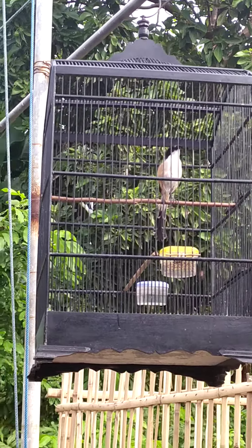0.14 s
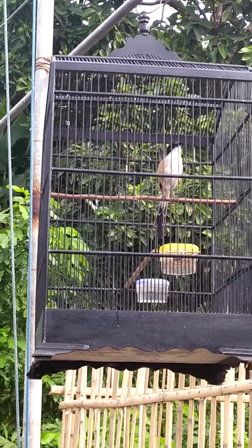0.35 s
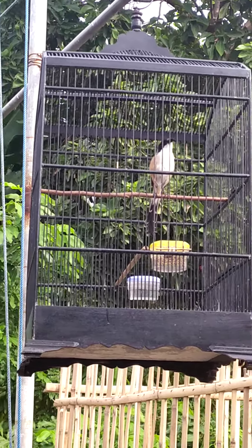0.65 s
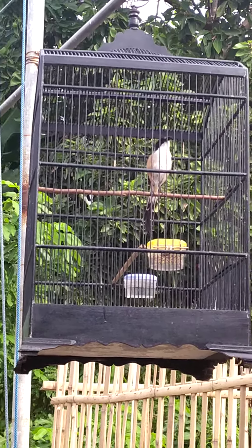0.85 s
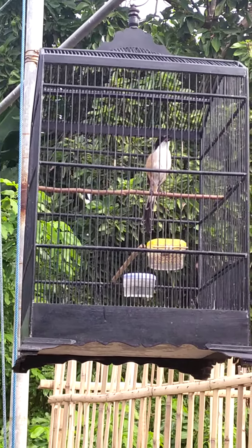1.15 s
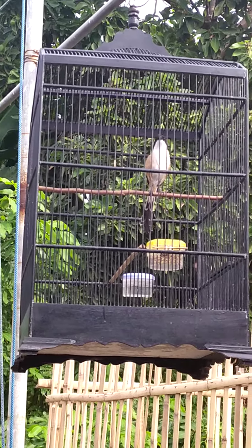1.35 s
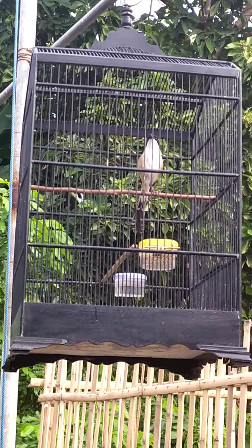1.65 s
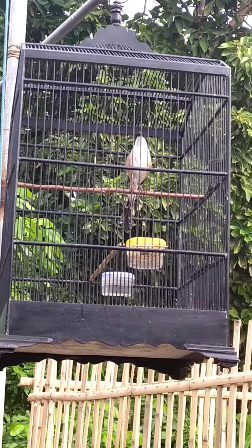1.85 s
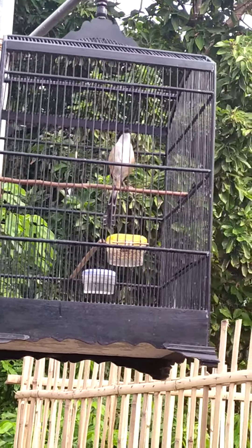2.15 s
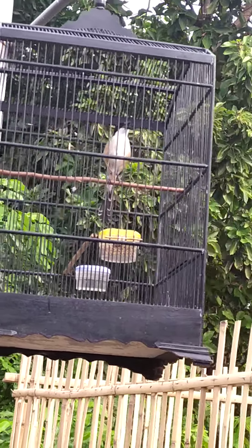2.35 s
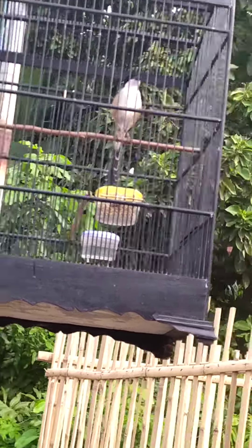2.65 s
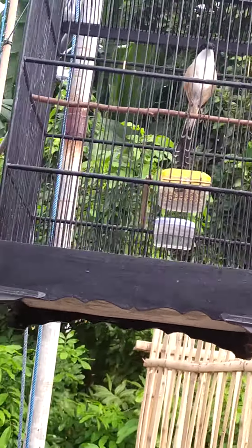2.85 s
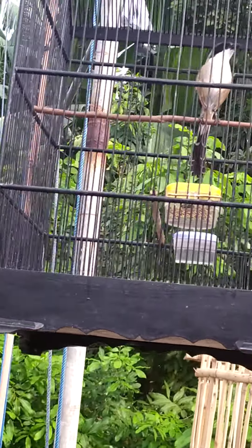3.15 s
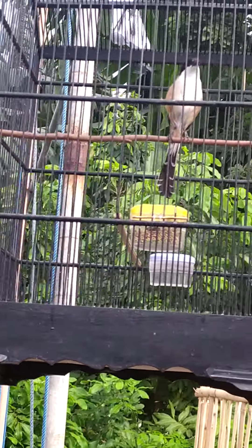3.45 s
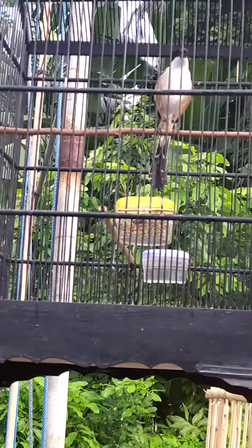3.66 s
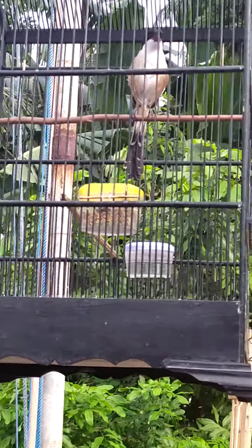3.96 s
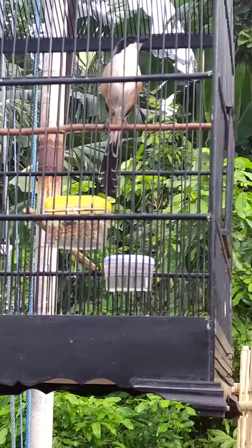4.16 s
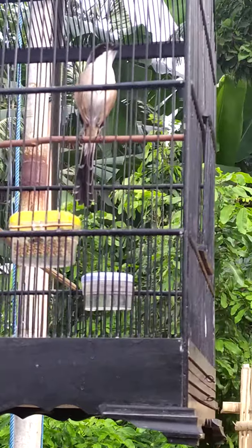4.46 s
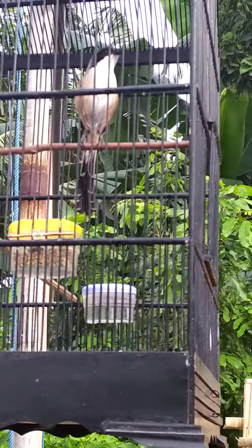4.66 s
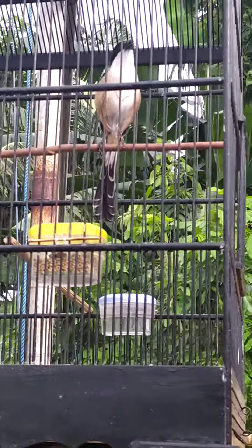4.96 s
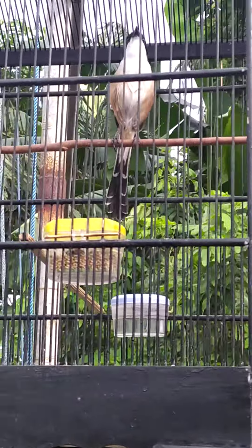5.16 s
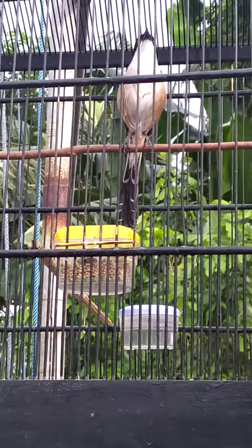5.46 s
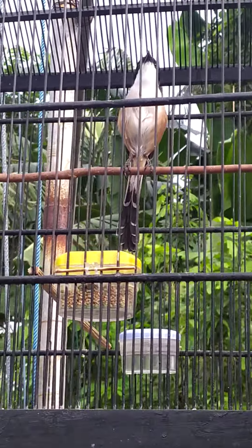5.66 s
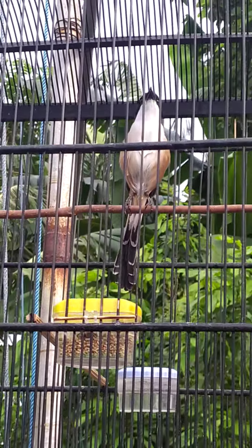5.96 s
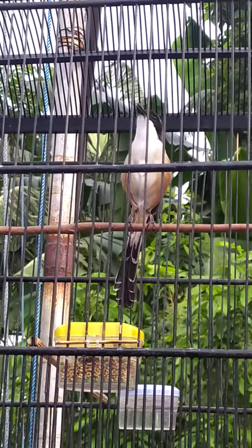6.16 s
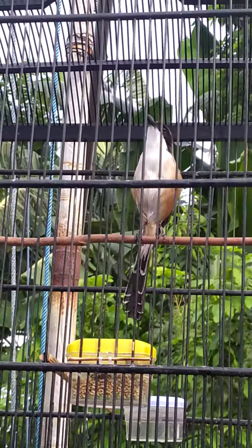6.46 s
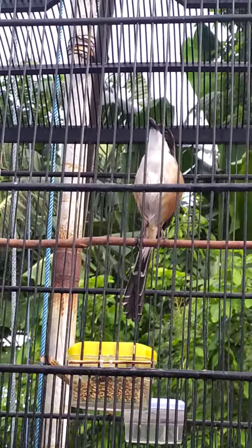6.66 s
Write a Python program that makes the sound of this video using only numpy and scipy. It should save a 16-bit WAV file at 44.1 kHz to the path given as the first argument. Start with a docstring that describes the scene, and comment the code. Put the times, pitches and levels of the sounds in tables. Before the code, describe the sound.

A caged songbird sings close by outdoors with sharp chips, rasping slurs, buzzes and falling whistles over a faint low hum.

```python
"""A caged shrike sings close by in a garden: two rasping slurs, a run of chips, buzzes, falling whistles.
Its syrinx membranes flutter and jitter as the voice roughens; both sides sound in slurs and chips.
Four sharp snaps fall among the notes. Cage and walls throw the song back.
Behind it, over gusty air, a far engine hums, other birds call faintly and small knocks come from nearby."""
import sys
import numpy as np
from scipy import signal
from scipy.fft import rfft, irfft, next_fast_len
from scipy.io import wavfile
from scipy.ndimage import uniform_filter1d

SR = 44100
rng = np.random.default_rng(int(sys.argv[2]) if len(sys.argv) > 2 else 0)


def generate_wav(sig):
    """Save sig (samples, or channels by samples) to the path in sys.argv[1] as 16-bit PCM at SR."""
    pcm = np.round(np.clip(np.atleast_2d(sig).T, -1, 1) * 32767).astype(np.int16)
    wavfile.write(sys.argv[1], SR, pcm)


N = 300321
BAND_EDGE_HZ = 16300


def amp(db):
    """Decibels to gain."""
    return 10 ** (np.asarray(db) / 20)


def unit_rms(x):
    """Scales to rms 1."""
    return x / np.sqrt(np.mean(x ** 2) + 1e-20)


def lookup(points, hz):
    """Interpolates a table on a log-frequency axis."""
    f, value = np.transpose(points)
    return np.interp(np.log(np.abs(hz) + 1), np.log(f + 1), value)


def ramp(t, span):
    """Linear rise from 0 to 1 over span."""
    return np.clip(t / span, 0, 1)


def step(t, width):
    """S-curve from 0 to 1 around t = 0."""
    return .5 + .5 * np.tanh(.5 * t / width)


def envelope_db(t, attack_s, fade_db_per_s, release_s, power=1):
    """Attack, steady fade and release."""
    gate = ramp(t, attack_s) ** power * ramp(t[-1] - t, release_s)
    return 20 * np.log10(gate + .02) - fade_db_per_s * np.maximum(t - attack_s, 0)


def add(mix, start_s, sound):
    """Mixes a sound in at start_s."""
    part = mix[..., max(round(start_s * SR), 0):][..., :sound.shape[-1]]
    part += sound[..., :part.shape[-1]]


def wander(size, hz):
    """Random drift up to hz, rms 1."""
    f = np.fft.rfftfreq(size, 1 / SR)
    return unit_rms(irfft(rfft(rng.standard_normal(size)) / (1 + (f / hz) ** 4), size))


def lowpass(x, hz):
    """Steep low-pass for complex signals."""
    f = np.fft.fftfreq(len(x), 1 / SR)
    return np.fft.ifft(np.fft.fft(x) / (1 + (f / hz) ** 6))


def coloured(x, points, db_per_octave=0):
    """Filters by a spectrum table, keeping the power of white noise."""
    f = np.fft.rfftfreq(len(x), 1 / SR)
    gain = unit_rms(amp(lookup(points, f) + db_per_octave * np.log2(f + 100)))
    return irfft(rfft(x) * gain, len(x))


# Each row: frequency in Hz, relative density in dB.
AIR_SPECTRUM = [(25, -15), (45, -5), (65, 0.5), (110, 0), (160, -13), (260, -19), (600, -25.5), (1200, -31),
                (2200, -30.5), (4700, -35), (6500, -37), (12500, -35.5), (16000, -43.5)]
# Each row: frequency in Hz, left-right correlation before the cap.
AIR_CORRELATION = [(60, 1), (180, 1), (550, 0.76), (1650, 0.096), (15000, 0)]


def air():
    """Gusty rumble under an even hiss."""
    f = np.fft.rfftfreq(N, 1 / SR)
    left, independent = rfft(rng.standard_normal((2, N)))
    correlation = np.clip(lookup(AIR_CORRELATION, f), -.93, .93)
    right = correlation * left + np.sqrt(1 - correlation ** 2) * independent
    steady = unit_rms(irfft(np.array([left, right]) * amp(lookup(AIR_SPECTRUM, f)), N))
    rumble = irfft(rfft(steady) / (1 + (f / 200) ** 2), N)
    gusts = amp(1.2 * wander(N, 4)) - 1
    return amp(-54.5) * (steady + gusts * rumble)


def far_engine(first_hz=104.6, revved_hz=134, rev_at_s=5.45, nearest_at_s=4.03, pass_s=1.16):
    """A wavering hum, loudest as the engine passes; it holds one speed, then revs up."""
    t = np.arange(N) / SR
    hz = first_hz + (revved_hz - first_hz) * step(t - rev_at_s, .05)
    hz *= 1 + .0131 * wander(N, 16)
    hum = np.sqrt(2) * np.sin(2 * np.pi * np.cumsum(hz) / SR)
    distance = np.hypot(1, (t - nearest_at_s) / pass_s)
    return hum * amp(-57 + 2 * wander(N, 10)) / distance


# Each row: start and length in seconds, first and last pitch in Hz before the arch, level in dB,
# waver as a share of pitch.
FAR_CALLS = [(0.009, 0.92, 720.3, 631, -63.5, 0.15), (0.33, 0.3, 5180, 4450, -73, 0.022),
             (0.32, .13, 4230, 4020, -75, .01), (0.947, 0.25, 4580, 4110, -65, 0.017),
             (1.801, 0.26, 690, 655, -65.5, 0.0087), (4.415, 0.098, 2420, 2200, -68, 0.017),
             (6.493, 0.085, 681, 688, -53, 0.013), (6.767, 0.064, 635, 713, -58.5, .01)]


def far_birds():
    """Faint arched whistles and coos."""
    out = np.zeros(N)
    for start_s, length_s, first_hz, last_hz, db, waver in FAR_CALLS:
        progress = np.linspace(0, 1, int(length_s * SR))
        arch = np.sin(np.pi * progress)
        hz = first_hz + (last_hz - first_hz) * progress
        hz *= 1 + .0594 * (arch - .7) + waver * wander(len(hz), 58)
        add(out, start_s, amp(db) * np.sqrt(2 * abs(arch)) * np.sin(2 * np.pi * np.cumsum(hz) / SR))
    return out


# Each row: start in seconds, level in dB, decay in seconds, tilt in dB per octave.
KNOCKS = [(0.486, -53, 0.026, 1), (0.848, -49.5, 0.028, 1), (2.148, -52, 0.043, -2),
          (2.575, -54, 0.086, 14.5), (2.623, -44.5, 0.032, 8), (3.293, -53.5, 0.018, 5),
          (3.781, -57.5, 0.54, 6.5), (4.648, -50, 0.026, 4), (5.541, -44.5, 0.019, 5.5),
          (5.59, -55, 0.048, 5)]
# Each row: frequency in Hz, relative level in dB.
KNOCK_SPECTRUM = [(100, 17), (400, 14.5), (900, 6.5), (1900, 5.5), (3500, -5.5), (8000, -13),
                  (12000, -20.5), (16000, -29)]


def knocks():
    """Small dry knocks and scuffs: decaying noise bursts."""
    out = np.zeros((2, N))
    t = np.arange(SR // 4) / SR
    for start_s, db, decay_s, tilt in KNOCKS:
        for channel in out:
            noise = coloured(rng.standard_normal(len(t)), KNOCK_SPECTRUM, tilt)
            add(channel, start_s, amp(db) * noise * np.exp(-t / decay_s))
    return out


# Each row: frequency in Hz, gain of the open beak on overtones in dB.
BEAK_RESPONSE = [(4000, -7), (6000, 3.5), (7500, 5.5), (9000, -3), (10200, -18.5), (11400, 20.5),
                 (12200, 3.5), (13500, -2), (16000, -20.5)]
# Air rushing through the syrinx. Each row: frequency in Hz, relative level in dB.
BREATH_SPECTRUM = [(1500, -42), (3000, 13.5), (7500, 6.5), (10000, -4), (12300, 6.5), (14500, -11.5),
                   (16000, -30)]


def syrinx(gesture, harmonics, flutter_hz, swing, jitter, shimmer, throat_hz, hiss_db):
    """One note as a complex wave: a membrane whose pitch and strength flutter as it turns rough."""
    hz, level_db, rough = gesture
    size = len(hz)
    hz = uniform_filter1d(hz, size=260, mode="nearest") * (1 + .009 * wander(size, 90))
    flutter = np.sin(2 * np.pi * np.cumsum(flutter_hz * (1 + .15 * wander(size, 90))) / SR)
    phase = 2 * np.pi * np.cumsum(hz) / SR
    wobble = 2 * np.pi * np.cumsum(hz * rough * (swing * flutter + jitter * wander(size, 900))) / SR
    strength = np.exp(shimmer * rough * (flutter + wander(size, 750)) - (shimmer * rough) ** 2)
    brightness_db = .078 * (level_db - max(level_db.max(), -20)) + .5  # soft singing is duller
    wave = 0
    for k, db in harmonics:
        # The throat tracks the pitch and passes only sidebands near each harmonic.
        sidebands = lowpass(strength * np.exp(1j * k * wobble), throat_hz * np.sqrt(k))
        gain = amp(db + (k > 1) * (lookup(BEAK_RESPONSE, k * hz) + brightness_db)) * (k * hz < SR / 2)
        wave = wave + gain * sidebands * np.exp(1j * k * phase)
    hiss = amp(hiss_db) * coloured(rng.standard_normal(size), BREATH_SPECTRUM)
    return amp(level_db) * (wave / np.std(wave.real) + hiss) * signal.windows.tukey(size, .03)


def couple(high, low):
    """The two sides of the syrinx couple and add sum tones."""
    power = uniform_filter1d(abs(high) ** 2 + abs(low) ** 2, size=200)
    sum_tones = high * low / np.sqrt(abs(power) + 1e-10)
    return (high + low + amp(-7.5) * sum_tones).real


def slur_gesture(length_s, first_hz, last_hz, turn_s, width_s, peak_s, db, rough):
    """Pitch, level and roughness of a slur: it swells and clears into an S-turn, then fades."""
    swell_db, fade_db_per_s = 11, 328
    t = np.arange(0, length_s, 1 / SR)
    hz = first_hz + (last_hz - first_hz) * step(t - turn_s, width_s)
    swell = ramp(t, peak_s)
    level_db = db + swell_db * (swell - 1) - fade_db_per_s * np.maximum(t - peak_s, 0)
    level_db += envelope_db(t, attack_s=.0015, fade_db_per_s=0, release_s=.021)
    return hz, level_db, rough * (1 - .84 * swell ** 2)


# Each row: start and length in seconds, first and last pitch in Hz, turn time, turn width and
# peak time in seconds within the note, level in dB, roughness 0-1.
SLURS = [(1.206, 0.098, 4550, 3140, .07, 0.0079, 0.063, -28.5, 0.9),
         (1.441, 0.11, 4465, 6320, .044, 0.0075, 0.04, -29.5, 0.71)]
# Each row: harmonic number, level before the beak in dB.
SLUR_HARMONICS = [(1, 1), (2, -13.5), (3, -19)]


def slurs(lag_s=.024):
    """Rasping slurs on the high side of the syrinx; the low side joins the first and plunges later."""
    high, low = np.zeros((2, N), complex)
    for start_s, *shape in SLURS:
        add(high, start_s, syrinx(slur_gesture(*shape), SLUR_HARMONICS, flutter_hz=115,
                                  swing=.085, jitter=.05, shimmer=.4, throat_hz=900, hiss_db=-14))
    start_s, length_s, _, _, turn_s = SLURS[0][:5]
    under = slur_gesture(length_s + lag_s, first_hz=3120, last_hz=1583, turn_s=turn_s + lag_s,
                         width_s=.007, peak_s=turn_s + lag_s, db=-36.5, rough=.4)
    add(low, start_s, syrinx(under, SLUR_HARMONICS, flutter_hz=123.8,
                             swing=.047, jitter=.078, shimmer=.3, throat_hz=599.03, hiss_db=-27))
    return couple(high, low)


# Each row: time in seconds, level in dB, tilt in dB per octave, ring boost in dB.
SNAPS = [(1.516, 18.5, 0.5, 8.5), (2.895, 13, -0.5, 3), (3.6075, 15.5, 1, 5), (6.3749, 8.5, 1.5, -1)]
# Each row: frequency in Hz, relative level in dB.
SNAP_SPECTRUM = [(100, -14), (300, -17.5), (900, -15.5), (1700, -10.5), (2500, -6.5), (3500, -12),
                 (4500, -7), (5200, 3.5), (6300, -1.5), (7300, -12), (12000, -13.5), (16000, -22)]


def snaps(sweep_s=.0012, ring_hz=5400):
    """Sharp cracks that sweep from treble to bass and ring briefly."""
    out = np.zeros(N)
    f = np.fft.rfftfreq(1024, 1 / SR)
    sweep_phase = 2 * np.pi * np.cumsum(sweep_s * (.5 - f / BAND_EDGE_HZ)) * f[1]
    ring = np.exp(-((f - ring_hz) / 900) ** 2)
    for time_s, db, tilt, ring_db in SNAPS:
        colour = unit_rms(amp(lookup(SNAP_SPECTRUM, f) + tilt * np.log2(f + 100) + ring_db * ring))
        crack = np.fft.fftshift(irfft(colour * np.exp(-1j * sweep_phase)))
        add(out, time_s - len(crack) / 2 / SR, amp(db) * crack)
    return out


def rasp_gesture(length_s=.083, first_hz=2444, drop_hz_per_s=76000, break_s=.0115, broken_hz=2730):
    """Pitch, level and roughness of a rasp: a short clean drop, then the voice breaks and dies."""
    t = np.arange(0, length_s, 1 / SR)
    broken = step(t - break_s, .0013)
    clean = 1 - broken
    hz = (first_hz - drop_hz_per_s * t) * clean + broken_hz * broken
    level_db = envelope_db(t, attack_s=.0023, fade_db_per_s=800.5, release_s=.0037) - 10 * clean
    return hz, level_db, .2 * clean + 1.06 * broken


def scoop_gesture(slide_s, dip_hz, accent_db, top_hz=5500, flick_hz=6140):
    """Pitch, level and roughness of a scoop: it starts hoarse, clears, slides down and flicks up."""
    flick_s, hold_s, release_s, clear_s = .019, .0054, .0037, .007
    t = np.arange(0, slide_s + flick_s + hold_s + release_s, 1 / SR)
    slide = ramp(t, slide_s)
    flick = np.sin(np.pi / 2 * ramp(t - slide_s, flick_s)) ** 2
    hz = top_hz + (dip_hz - top_hz) * (slide + .28 * slide * (1 - slide)) + (flick_hz - dip_hz) * flick
    level_db = envelope_db(t, attack_s=.012, fade_db_per_s=192, release_s=release_s)
    level_db += (accent_db + 6.5) * flick
    return hz, level_db, .13 + .6 * np.exp(-t / clear_s) + .15 * np.sin(np.pi * flick)


# Each row: start and scoop delay in seconds, level in dB, slide in seconds, dip pitch in Hz,
# flick accent in dB.
CHIPS = [(1.794, .015, -25, 0.049, 4210, -8.5), (2.081, .016, -26, 0.047, 4050, -6.5),
         (2.38, 0.016, -22.5, 0.043, 4470, -9), (2.686, 0.015, -23, 0.048, 4337, -5),
         (3.002, 0.022, -23, 0.043, 4530, -4.5), (3.31, .02, -22.5, .050, 4390, -4),
         (3.621, 0.02, -22, 0.05, 4330, -5.5), (3.951, 0.019, -21.5, 0.054, 4224, -6)]
# Each row of both: harmonic number, level before the beak in dB.
RASP_HARMONICS = [(1, 0.5), (2, 12), (3, 5), (4, -2), (5, -12.5), (6, -3)]
SCOOP_HARMONICS = [(1, 0), (2, -11.5), (3, -19.5)]


def chips():
    """Each chip is a rasp on the low side of the syrinx, dying under a scoop on the high side."""
    high, low = np.zeros((2, N), complex)
    for start_s, delay_s, db, *shape in CHIPS:
        scoop = syrinx(scoop_gesture(*shape), SCOOP_HARMONICS, flutter_hz=199.6,
                       swing=.021, jitter=.079, shimmer=.24, throat_hz=833, hiss_db=-32.5)
        rasp = syrinx(rasp_gesture(), RASP_HARMONICS, flutter_hz=170,
                      swing=.12, jitter=.08, shimmer=.45, throat_hz=600, hiss_db=-11)
        add(low, start_s, amp(db) * rasp)
        add(high, start_s + delay_s, amp(db) * scoop)
    return couple(high, low)


def falling_gesture(length_s, attack_s, top_hz, last_hz, bow, db, fade_db_per_s, late_push_db, rough,
                    attack_power, hoarsening=0):
    """Pitch, level and roughness of a buzz or whistle: pitch springs up with the breath, both sink."""
    t = np.arange(0, length_s, 1 / SR)
    progress = t / length_s
    fall = progress + bow * progress * (1 - progress)  # positive bow: steep first
    spring = 1 - .27 * np.exp(-t / (.22 * attack_s))
    hz = (top_hz + (last_hz - top_hz) * fall) * spring
    level_db = db + envelope_db(t, attack_s, fade_db_per_s, .11 * length_s, attack_power)
    # Pushes of breath at the peak and near the end.
    level_db += 2.5 * np.exp(-((t - attack_s) / .0135) ** 2)
    level_db += late_push_db * np.exp(-((t - .85 * length_s) / .028) ** 2)
    hoarse = 1 - hoarsening * .81 * (1 - ramp(t - attack_s, attack_s))
    patches = np.exp(hoarsening * .38 * wander(len(t), 44.3))
    return hz, level_db, rough * hoarse * patches * (1 - .8 * progress ** 2)


# Each row: start, length and attack in seconds, top and last pitch in Hz, bow of the fall,
# level in dB, fade in dB per second, late push in dB, roughness 0-1.
BUZZES = [(4.875, .305, 0.091, 3970, 2837, 0.98, -21.5, 62.3, 0.89, 1),
          (6.752, .12, 0.083, 3900, 3526, 0, -19.5, 65, 0, 0.97)]
# Each row: harmonic number, level before the beak in dB.
BUZZ_HARMONICS = [(1, 7.5), (2, -18), (3, -19.5), (4, -46)]


def buzzes():
    """One side of the syrinx flutters fast, rough from the onset."""
    out = np.zeros(N)
    for start_s, *shape in BUZZES:
        note = syrinx(falling_gesture(*shape, attack_power=1.8), BUZZ_HARMONICS, flutter_hz=372,
                      swing=.045, jitter=.058, shimmer=.45, throat_hz=580, hiss_db=-36)
        add(out, start_s, note.real)
    return out


# Each row: start, length and attack in seconds, top and last pitch in Hz, bow of the fall,
# level in dB, fade in dB per second, late push in dB, roughness 0-1.
WHISTLES = [(5.249, 0.043, .013, 2500, 2324, 0.54, -45.5, 194, -1, 0.03053),
            (5.396, 0.35, 0.062, 4252, 2864, 0.8, -18, 82.6, 4.5, 0.047),
            (5.84, .088, .017, 2346, 1728, -0.8, -36, 106, -2.5, .08),
            (5.999, .368, .064, 4033, 2242, -0.02, -22, 82.3, -11, 0.14)]
# Each row: harmonic number, level before the beak in dB.
WHISTLE_HARMONICS = [(1, 6), (2, -23), (3, -28)]


def whistles():
    """One side of the syrinx sings clear up to the peak, then hoarse in patches as it falls."""
    out = np.zeros(N)
    for start_s, *shape in WHISTLES:
        note = syrinx(falling_gesture(*shape, attack_power=1.15, hoarsening=1), WHISTLE_HARMONICS,
                      flutter_hz=330, swing=.08, jitter=.11, shimmer=.65, throat_hz=380, hiss_db=-56)
        add(out, start_s, note.real)
    return out


# Each row: left and right delay in seconds, gain.
CAGE_ECHOES = [(.0008, .0005, 0.031), (.0017, 0.001505, -0.3), (.0046, 0.0026, 0.094),
               (.0068, 0.014, 0.032), (0.0091, .0094, -.11), (0.0124, .0141, -0.063)]


def cage(x):
    """First reflections from the tray, the roof and the nearest wall."""
    out = np.zeros((2, N))
    for left_s, right_s, gain in CAGE_ECHOES:
        add(out[0], left_s, gain * x)
        add(out[1], right_s, gain * x)
    return out


# Each row: frequency in Hz, time to fall 60 dB in seconds.
YARD_T60 = [(200, 0.3), (1000, 0.25), (2500, 0.28), (5000, 0.3), (9000, 0.26), (15000, 0.21)]


def yard(x):
    """Diffuse tail: a quick part from near walls and a fainter long one."""
    taps = rng.standard_normal((2, SR // 2)) * (rng.random((2, SR // 2)) < .12)
    hz, t, spectra = signal.stft(taps, SR, nperseg=256)
    fade = amp(-60 * t / lookup(YARD_T60, hz)[:, None])
    near_walls = 1 + 3 * np.exp(-t / .015)
    tail = signal.istft(spectra * fade * near_walls * (t > .004), SR, nperseg=256)[1]
    tail /= np.linalg.norm(tail, axis=1, keepdims=True)
    return signal.fftconvolve(x[None], tail, axes=1)[:, :N]


# Each row: frequency in Hz, left minus right level in dB.
PORT_BALANCE = [(500, 5.5), (2100, 9), (2900, 4.5), (3700, 6), (4400, 0), (7500, -0.5), (9500, -3),
                (13000, 4), (16000, -1)]
# Each row: frequency in Hz, left lag in radians.
PORT_LAG = [(200, 0.41), (2000, 1.3), (3100, 2.77), (3900, 5.31), (5000, 8.39), (7200, 11.68),
            (8500, 15.86), (16000, 29.43)]


def mic_ports(x, direct):
    """The housing shades each microphone port in its own way; direct sound reaches the right first."""
    size = next_fast_len(N + SR)
    f = np.fft.rfftfreq(size, 1 / SR)
    shade = amp(lookup(PORT_BALANCE, f) / 2)
    lag_rad = lookup(PORT_LAG, f) if direct else 0
    response = np.array([shade * np.exp(-1j * lag_rad), 1 / shade])
    return irfft(rfft(x, size) * response, size)[:, :N]


# The part of a snap that spreads to the walls. Each row: frequency in Hz, relative gain in dB.
SNAP_SPILL = [(300, -7.5), (1500, -9.5), (2600, 8.5), (5500, -4), (8000, -1), (12000, 2), (16000, -5.5)]


def scene():
    """Cage and yard answer the bird, which twitters sideways and faces front for its drier long notes."""
    sideways = chips() + slurs()
    frontal = buzzes() + whistles()
    bird = sideways + frontal
    cracks, far = snaps(), far_birds()
    spill = coloured(cracks, SNAP_SPILL)
    reflected = cage(bird + amp(-2) * spill)
    reflected += yard(amp(-5.5) * sideways + amp(-8) * frontal + amp(-16) * spill)
    near = mic_ports(bird + cracks, direct=True) + mic_ports(reflected, direct=False)
    return near + .5 * far + .61 * yard(far) + knocks() + air() + far_engine()


def record(dry, low_cut_hz=36, ceiling=.85):
    """The microphone drops the deepest rumble, rounds off the loudest peaks and limits the band."""
    thinned = signal.sosfilt(signal.butter(4, low_cut_hz, "high", fs=SR, output="sos"), dry)
    rounded = ceiling * np.tanh(thinned / ceiling)
    band_limit = signal.firwin(511, BAND_EDGE_HZ, window=("kaiser", 9), fs=SR)
    return signal.oaconvolve(rounded, band_limit[None], "same")


dry = scene()
out = record(dry)
generate_wav(out)
```